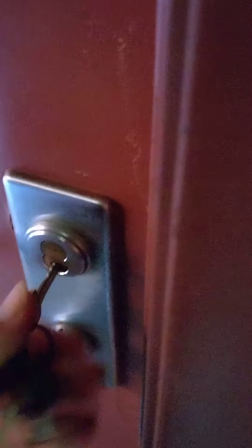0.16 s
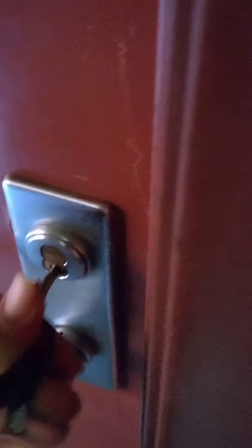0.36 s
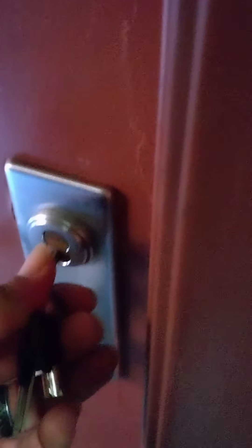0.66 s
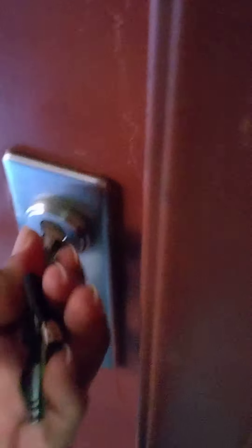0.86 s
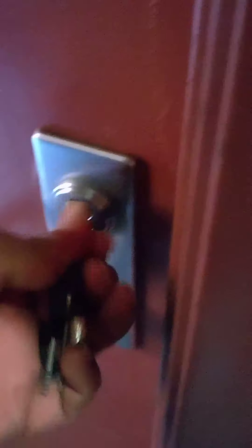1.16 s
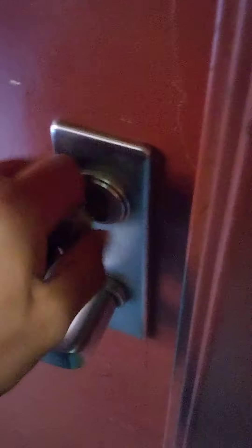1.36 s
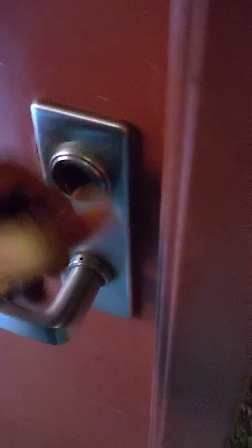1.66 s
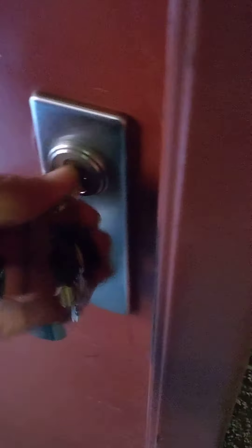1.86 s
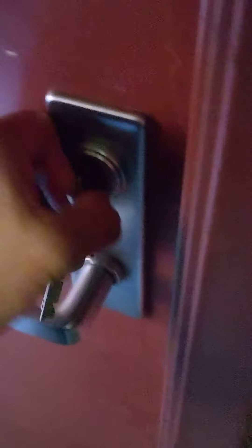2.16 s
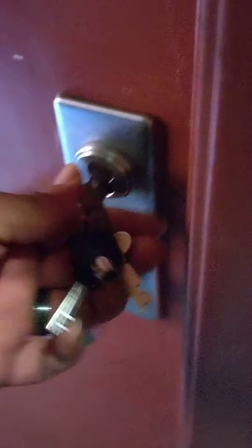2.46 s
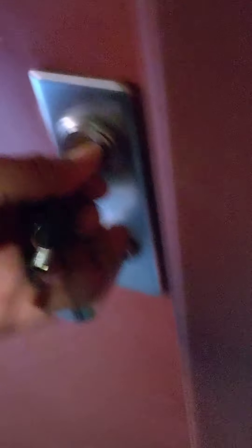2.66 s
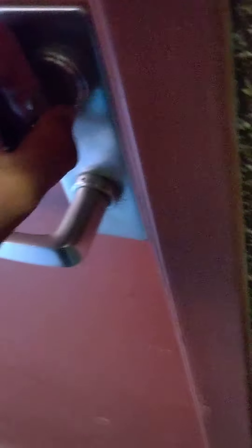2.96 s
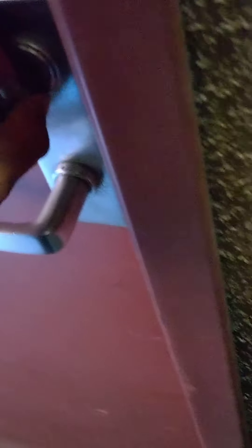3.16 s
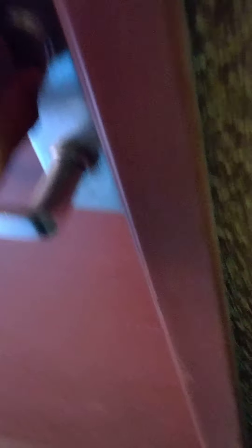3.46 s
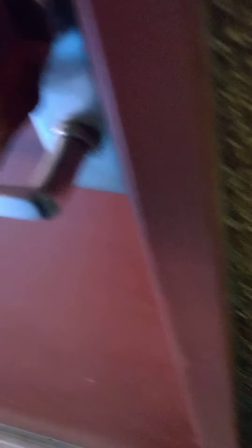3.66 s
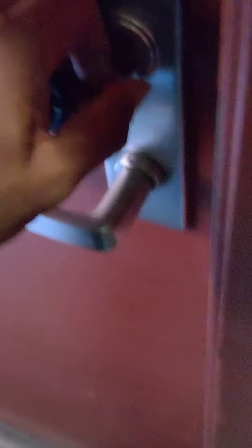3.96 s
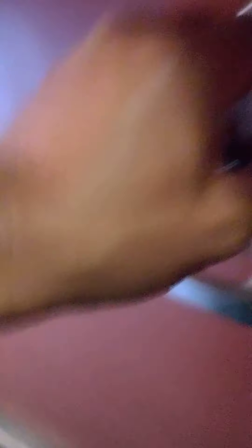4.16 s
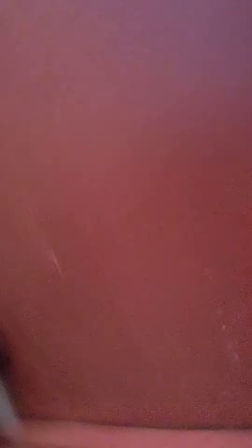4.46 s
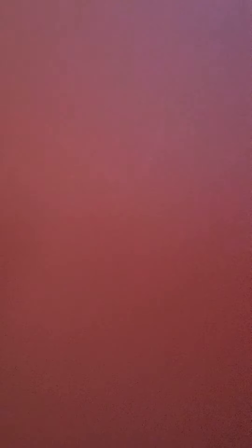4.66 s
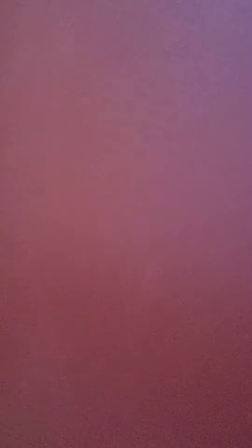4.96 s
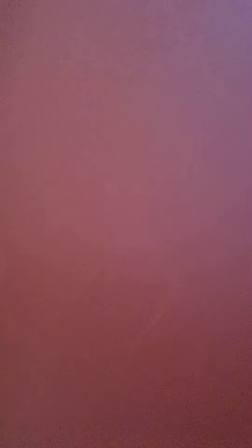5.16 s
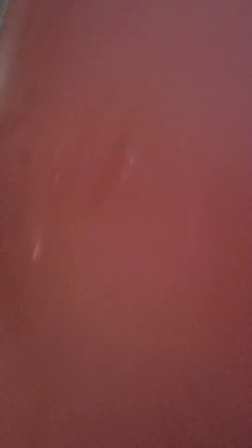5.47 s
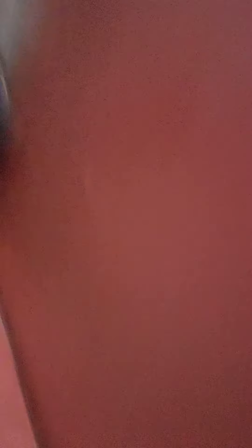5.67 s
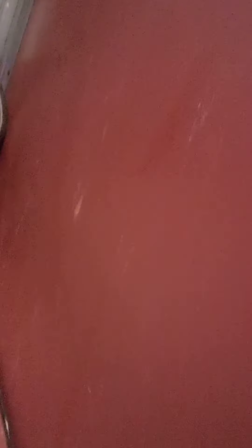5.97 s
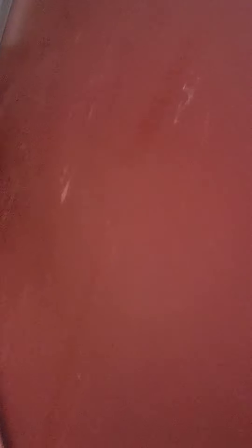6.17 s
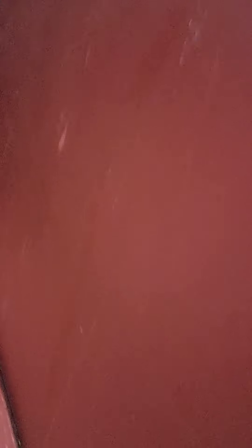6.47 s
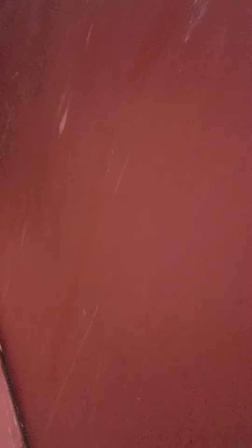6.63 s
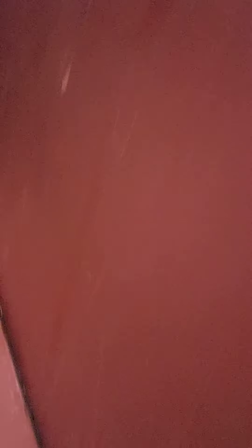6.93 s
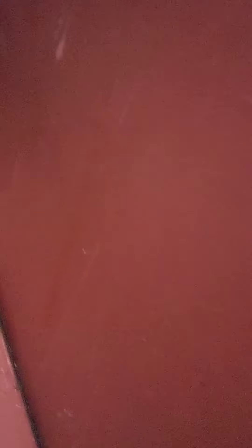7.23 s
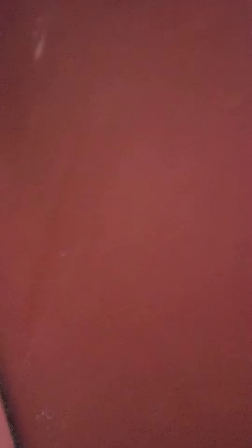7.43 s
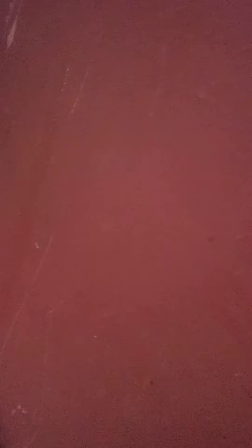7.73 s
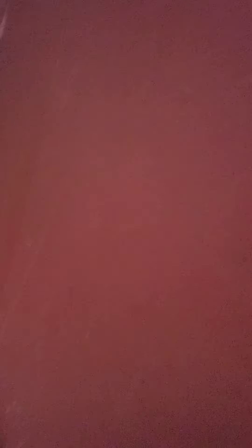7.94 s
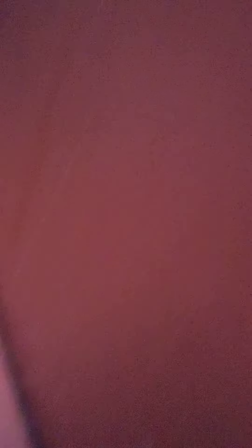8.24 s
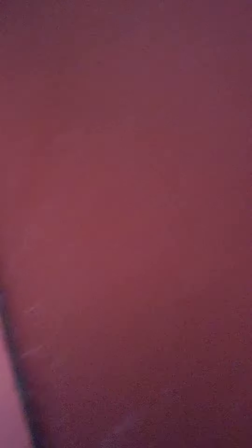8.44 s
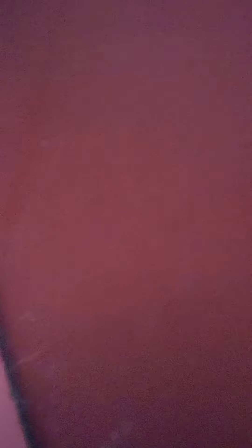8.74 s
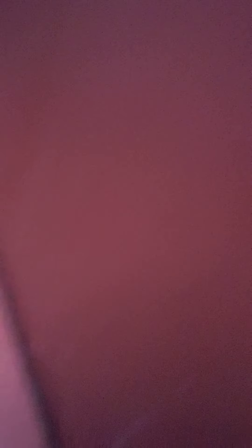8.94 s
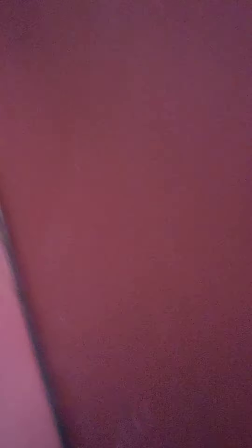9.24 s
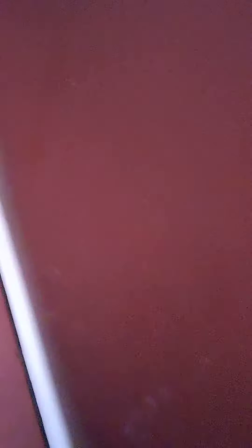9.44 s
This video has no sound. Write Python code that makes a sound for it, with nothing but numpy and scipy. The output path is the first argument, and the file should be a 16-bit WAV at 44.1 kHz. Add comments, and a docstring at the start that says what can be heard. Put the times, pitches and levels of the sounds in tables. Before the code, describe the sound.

A quiet hallway with faint low building hum and slight hiss, heard very close on a hand-held phone, the lock and keys leaning left. From 0.2 to 1.4 s a key clicks and knocks in the lock, with a strong click at 0.5 and a harder clack with a crunchy scrape around 1.4. From 1.6 to 2.8 bright, crisp key clinks jingle in clusters. It thins from 3 to 4.7, with weak knocks, a low grip bump near 3.8 and a skin brush at 4.1. Dull thuds, lock clicks and dry casing ticks come at 5 to 6. Light jingling and small clicks build from 6.2 to 7.6, then rapid knocks lead to a very loud bolt snap at 7.87, its door body and plate humming on briefly. From 8.4 to 9.4 come ringing clinks, clicks, scrapes and casing ticks, fading with a soft brush.

```python
"""Keys in a door lock

A bunch of keys is worked in a door lock in a quiet hallway, close to a hand-held phone with two ports.
Loose keys crack and ring as struck resonators; key and bolt knock and scrape, and the door panel answers.
Skin brushes past, loose parts shift and the casing ticks, all as shaped noise; jolts wobble the grip.
The room adds feedback echoes, the building hums faintly and the left signal sags a few times."""
import sys
import numpy as np
from scipy import signal
from scipy.fft import rfft, irfft, next_fast_len
from scipy.io import wavfile

SR = 44100
rng = np.random.default_rng(int(sys.argv[2]) if len(sys.argv) > 2 else 0)


def unload_audio(sound):
    """Save the sound as a 16-bit wav file, at the path given as the first command line argument."""
    columns = np.transpose(np.atleast_2d(sound))
    # keep every value between -1 and 1, then stretch to whole-number steps
    steps = np.round(np.clip(columns, -1, 1) * 32767)
    wavfile.write(sys.argv[1], SR, steps.astype(np.int16))


N = 423353

# Levels in the tables are relative: each layer trims and filters its own sound afterwards.
# building hum and microphone hiss, the spectrum: (frequency [Hz], level per Hz [dB])
HALL_SPECTRUM = [(8.2, -38.5), (14, 11.5), (36, -1.5), (76, -14.5), (121, -4.5), (245, -6), (858, -25),
                 (3380, -37.5), (6820, -41), (9400, -30.5), (13700, -47.5), (15000, -46.5)]
# how alike the hum is at the two ports: (frequency [Hz], likeness [0 to 1])
HALL_LIKENESS = [(60, 0.94), (300, 0.91), (700, 0.34), (2000, 0.)]
# downward steps of the left signal: (time [s], depth [dB])
SAGS = [(6.821, -42), (7.87, -16.5), (8.478, -19), (8.929, -33.5)]
# jolts through the grip: (time [s], slow wobble level [dB], thud level [dB])
JOLTS = [(.0, -51, -50), (0.449, -42, -38.5), (1.042, -41.5, -41), (1.87, -49, -55), (3.503, -45, -73),
         (3.83, -36, -44), (5.06, -42, -42), (5.491, -47.5, -31), (5.819, -45, -44)]
# skin brushing past the left port: (start [s], length [s], level [dB])
BRUSHES = [(4.086, 0.26, -58), (5.158, 0.3, -68), (8.337, 0.15, -62.5), (9.393, 0.48, -66)]
# how strongly the hand moves the loose parts: (time [s], level [dB])
LOOSE_MOTION = [(0, -69), (.7, -82.5), (1.3, -72.5), (1.6, -61.5), (2.0, -74.5), (2.75, -65.5),
                (3.101, -88), (6.001, -83.5), (6.4, -74), (7.7, -71.5), (8.1, -83.5), (8.598, -67.5),
                (9.6, -82)]
# the phone's casing ticking in the grip, the last row a further dry snap played the same way: (time [s], level
# [dB])
CASING_TICKS = [(4.48, -47.5), (4.769, -51.5), (5.5763, -35), (5.9183, -32.5), (8.734, -36), (9.062, -34),
                (9.3337, -41)]
# how far keys and lock sit towards the left port: (time [s], left over right [dB])
BEARING = [(0, 7.5), (3, 3), (5.7, 7), (6.8, 7.5), (7.8, 12), (9.6, 7)]
# key or bolt dragged over metal: (start [s], length [s], treble level [dB], door body level [dB])
SCRAPES = [(0.338, 0.25, -73, -35.5), (1.412, 0.18, -53, -24), (1.492, 0.043, -50, -18),
           (7.664, 0.041, -56, -33.5), (8.613, 0.086, -87, -42), (9.067, 0.076, -55, -34.5)]
# the lock plate humming on after the bolt: (start [s], t60 [s], frequency [Hz], width [Hz], level [dB])
PLATE_HUM = (7.875, 1.4, 1560, 160, -58)
# modes of the door panel: (frequency [Hz], width [Hz], level [dB])
DOOR_MODES = [(465, 40, 5), (790, 80, 10), (1200, 150, 3), (1570, 120, 5), (1760, 90, 5)]
# key, pins, bolt and handle in the lock: (time [s], metal level [dB], door body over metal [dB])
KNOCKS = [(0.211, -42.5, -32), (0.351, -46.5, -21), (0.4167, -31, -25), (0.4387, -31, -18),
          (0.482, -23, -28.5), (0.61, -35, -19), (0.6556, -44, -23), (0.855, -52, -23),
          (1.041, -24.5, -19.5), (1.3373, -39.5, -16.5), (1.4325, -16, -19), (1.88, -49.5, -4.5),
          (2.0652, -46.5, -16), (2.54, -38.5, -50.5), (2.9895, -53.5, -8.5), (3.0472, -72, 11.5),
          (3.3902, -65.5, -1.5), (3.569, -74.5, 7), (3.728, -43.5, -26), (3.8359, -53, -5),
          (4.025, -37, -23), (4.996, -35, -18.5), (5.06, -42.5, -8), (5.4951, -28, -10), (5.5195, -29, -47),
          (5.701, -35, -15.5), (5.7145, -29, -24), (5.812, -48, -4.5), (6.034, -60, -10.5),
          (6.435, -48.5, -19.5), (6.556, -52.5, -8.5), (6.643, -50, -18), (6.7053, -34, -19),
          (6.7746, -47.5, -8.5), (7.098, -47.5, -9), (7.1578, -42, -19), (7.22, -37.5, -18),
          (7.242, -48.5, -11.5), (7.366, -61, 0), (7.6857, -28, -12.5), (7.768, -30, -24.5),
          (7.776, -28, -19), (7.805, -38.5, -20), (7.8398, -29.5, -8), (7.8547, -20.5, -18),
          (7.867, 0.5, -27), (7.8708, -10, -19), (8.355, -46.5, -22.5), (8.476, -21.5, -28.5),
          (8.5681, -32, -26.5), (8.591, -43, -24), (8.648, -44, -7), (8.668, -30.5, -30), (8.695, -48, -2),
          (8.769, -56.5, 0), (8.886, -23, -27), (9.1016, -26.5, -16), (9.197, -43, -18.5),
          (9.373, -32.5, -25.5)]
# ringing modes, one list for each of four keys: (frequency [Hz], level [dB], t60 [s])
KEY_MODES = [
    [(10110, -5, .14), (10340, -8, .05), (8200, -17, .025)],
    [(11670, -1, .12), (11820, -13, .06), (5480, -14, .1)],
    [(13090, -6, .1), (13210, -14, .06)],
    [(5590, -9, .04), (5960, -12, .05)],
]
# key on key: (time [s], crack level [dB], ring level [dB], names of the keys struck)
CLINKS = [(0.106, -45, -43.5, "cd"), (1.589, -45, -50, "cd"), (1.612, -38, -47, "d"), (1.662, -37, -60, ""),
          (1.6806, -22, -71, "bc"), (1.755, -34, -57, "a"), (1.7938, -26, -52, "abc"),
          (1.8337, -20, -30, "a"), (1.8395, -16, -35.5, "ab"), (1.937, -28, -41, "ab"),
          (2.078, -38, -50, ""), (2.0898, -19.5, -42, "acd"), (2.3462, -17, -42.5, "ac"),
          (2.3811, -14, -32, "ab"), (2.512, -33, -80, "b"), (2.7182, -12, -32.5, "ab"),
          (2.7444, -18, -58, "bc"), (2.7919, -24, -49, "ab"), (3.1424, -30, -35.5, "c"),
          (4.7968, -41, -46, "cd"), (4.858, -42, -57, "cd"), (6.152, -49, -57, "ad"),
          (6.2093, -47, -53.5, "cd"), (6.2645, -44, -62, "cd"), (6.292, -62, -53, "d"),
          (6.3568, -37.5, -65, "bcd"), (6.368, -54, -48, "d"), (6.41, -49, -66, ""),
          (6.8182, -16.5, -40, "bd"), (6.9494, -20.5, -45, "acd"), (7.3852, -35.5, -60, "a"),
          (7.4633, -15, -35, "ac"), (7.4715, -26, -43, "abc"), (7.557, -36.5, -56, "d"),
          (7.609, -29.5, -60.5, "ac"), (8.4742, -28, -17, "ac"), (8.9298, -14, -33.5, "ac"),
          (8.9365, -29, -43, "a"), (8.9465, -23, -48, "ac")]

HALL_RMS_DB = -58   # before a slight lean to the left
ROOM_BASS_T60_S, WALL_CUT_HZ, ROOM_DB = 0.7, 3300, -21.5
PORT_HZ, PORT_WIDTH_HZ, PORT_DB = 9300, 1070, 10.5   # cavity resonance of the microphone ports
LAG_S, LAG_SPREAD = .00048, .25   # delay to the right port; its random share on cracks
SAG_RETURN_HZ = 3.2
CRACK_S = 0.00051   # a crack peaks this long after contact
KNOCK_RATTLE_T60_S, BODY_RATTLE_T60_S = 0.053, 0.13   # metal and door body
MIDDLE_PAN, WOOD_PAN = .4, .2   # shares of the bearing
KEY_NAMES, SHAKEN_DB = "abcd", -17   # keys that are not struck ring this much lower
FLUTTER_DB, STRIKE_SPREAD_DB = 5, 3
TOP_HZ, CUTOFF_HZ = 14300, 15600


def amp(db):
    """Decibels to linear gain."""
    return 10 ** (np.asarray(db) / 20)


def rms_one(x):
    """Scale to an RMS of one."""
    return x / np.sqrt(np.mean(x ** 2) + 1e-20)


def silence():
    """An all but empty stereo track."""
    return np.full((2, N), 1e-18)


def band(x, low_hz, high_hz):
    """Band-pass filter."""
    return signal.sosfilt(signal.butter(2, [low_hz, high_hz], "band", fs=SR, output="sos"), x)


def resonate(x, hz, width_hz):
    """Two-pole resonance, gain 1 on top."""
    r = np.exp(-np.pi * width_hz / SR)
    zeros = np.array([1, 0, -1]) * (1 - r * r) / 2
    poles = [1, -2 * r * np.cos(2 * np.pi * hz / SR), r * r]
    return signal.lfilter(zeros, poles, x)


def port(x):
    """The microphone port lifts the treble around its resonance."""
    return x + amp(PORT_DB) * resonate(x, PORT_HZ, PORT_WIDTH_HZ)


def add(out, s, pan_db, sound, lag_s=LAG_S):
    """Lay a sound into both channels, later at the right port."""
    for side, sign in enumerate((1, -1)):
        at = round((s + side * lag_s) * SR)
        out[side, at:at + len(sound)] += amp(sign * pan_db / 2) * sound[:N - at]


def swell(s, length_s):
    """A smooth rise and fall."""
    progress = np.clip((np.arange(N) / SR - s) / length_s, 0, 1)
    return np.sin(np.pi * progress) ** 2


def burst(noise, rattle_t60_s, rattle_db):
    """A sharp crack, then a lumpy rattle that swells for a moment and dies more slowly."""
    t = np.arange(len(noise)) / SR
    crack = np.sign(noise) * t / CRACK_S * np.exp(1 - t / CRACK_S)
    lumps = np.minimum(noise[(t * 500).astype(int) - 600] ** 2, 2) + 1.11   # a new random level every 2 ms
    envelope = (1 - np.exp(-t / 0.0011)) * amp(rattle_db - 60 * t / rattle_t60_s)
    return crack + noise * lumps * envelope


def loose_ticks(per_s):
    """Random small contacts, a few several dB harder, under the level of the moving parts."""
    strength = amp(3 * np.minimum(rng.exponential(1, N), 2.6))
    ticks = (rng.random(N) < per_s / SR) * strength
    return rms_one(ticks) * amp(np.interp(np.arange(N) / SR, *np.transpose(LOOSE_MOTION)))


def hall():
    """Steady building hum and microphone hiss, alike at both ports only in the bass."""
    log_hz = np.log(np.fft.rfftfreq(N, 1 / SR) + 1)
    hz, level_db = np.transpose(HALL_SPECTRUM)
    spectrum_db = np.interp(log_hz, np.log(hz), level_db)
    hz, likeness = np.transpose(HALL_LIKENESS)
    alike = np.interp(log_hz, np.log(hz), likeness)
    mid, side = rfft(rng.standard_normal((2, N))) * amp(spectrum_db)
    both = np.sqrt(1 + alike) * mid + np.sqrt(1 - alike) * side * [[1], [-1]]
    return amp(HALL_RMS_DB) * rms_one(irfft(both, N)) * amp([[.8], [-.8]])


def room(x):
    """Six feedback delays a side, the treble dying faster."""
    size = next_fast_len(N + SR)
    hz = np.fft.rfftfreq(size, 1 / SR)
    t60 = ROOM_BASS_T60_S / np.sqrt(1 + (hz / WALL_CUT_HZ) ** 2)
    lags_s = rng.uniform(0.0091, 0.038, (2, 6, 1))
    loop = amp(-60 * lags_s / t60) * np.exp(-2j * np.pi * hz * lags_s)
    echoes = (loop / (1 - loop)).sum(axis=1)
    dulling = 1 + (hz / WALL_CUT_HZ / 2) ** 2
    return irfft(rfft(x.mean(axis=0), size) * echoes / dulling, size)[:, :N]


def sags():
    """A downward step in the left channel that the coupling high-pass returns with an overshoot."""
    steps = np.zeros(N)
    for s, depth_db in SAGS:
        steps[round(s * SR)] = -amp(depth_db)
    rounded = signal.lfilter([.02], [1, -.98], np.cumsum(steps))
    coupling = signal.butter(2, SAG_RETURN_HZ, "high", fs=SR, output="sos")
    return signal.sosfilt(coupling, rounded) * [[1], [0]]


def grip():
    """Jolts rock the phone as a decaying low wobble and thud in its body, each laid in for half a second."""
    t, out = np.arange(SR // 2) / SR, np.zeros((2, N))
    for s, wobble_db, thud_db in JOLTS:
        shake = rng.standard_normal(SR // 2)
        sway = np.sin(2 * np.pi * 19 * t) + amp(17.0) * band(shake[::-1], 34, 61)
        wobble = amp(wobble_db - 60 * t / 1.23) * sway
        thud = band(shake * amp(thud_db + 13.5 - 60 * t / 0.43), 90, 300)
        add(out, s, 2, wobble + thud)
    return out


def skin():
    """Skin hisses past the left port as swelling treble noise."""
    hiss = rms_one(port(band(rng.standard_normal((2, N)), 4400, 19845))) * amp([[5], [-9]])
    return hiss * sum(amp(db) * swell(s, length_s) for s, length_s, db in BRUSHES)


def shifting_parts():
    """Parts shift in the lock: noise that swells and dies in hundredths of a second at each contact."""
    flicker = signal.lfilter([.0005], np.poly([.9965, .9965]), loose_ticks(64))
    white = rng.standard_normal((3, N))
    shifting = flicker * (white[0] + 2.15 * white[1:])   # partly shared by both ports
    return amp(3.5) * band(shifting, 460, 1700) + amp(-10.5) * band(shifting, 3400, 11000)


def casing():
    """Dry snaps near the left port with a short hollow knock and hardly any rattle."""
    snaps = silence()
    for s, db in CASING_TICKS:
        snap = burst(rng.standard_normal(SR // 20), 0.005, -1.2)
        add(snaps, s, 17, amp(db - 12.5) * snap)
    return port(band(snaps, 1100, 13300)) + amp(16) * resonate(snaps, 530, 180)


def metal_bands(high, middle):
    """Treble through the port resonance, with the middle band inverted beneath it."""
    return port(band(high, 3400, 12000)) - amp(-0.5) * band(middle, 2500, 6400)


def scrapes():
    """Metal drags over metal: noise with uneven catches grinds in the treble and crunches in the door."""
    high, middle, crunch = silence(), silence(), silence()
    catches = np.repeat(rng.exponential(1, N // 64 + 1), 64)[:N]
    grit = rng.standard_normal(N) * (1.3 + catches)
    for s, length_s, treble_db, body_db in SCRAPES:
        drag = swell(s, length_s) * grit
        add(high, 0, 5, amp(treble_db) * drag)
        add(middle, 0, 2, amp(treble_db) * drag)
        add(crunch, 0, 4, amp(body_db) * drag, lag_s=0)
    return metal_bands(high, middle) + amp(-14.5) * band(crunch, 680, 1600)


def plate_hum():
    """The lock plate hums on after the bolt: narrow noise that starts at once and fades."""
    s, t60, hz, width_hz, db = PLATE_HUM
    since = np.arange(N) / SR - s
    fade = (since > 0) * amp(db - 60 * np.abs(since) / t60)
    return fade * rms_one(resonate(rng.standard_normal(N), hz, width_hz))


def knocks():
    """Metal cracks in the treble; the door panel answers lower and longer, more evenly at both ports."""
    high, middle, wood = silence(), silence(), silence()
    for s, db, body_db in KNOCKS:
        white = rng.standard_normal((2, SR // 4))
        pan_db = np.interp(s, *np.transpose(BEARING))
        metal = amp(db - 12.5) * burst(white[0], KNOCK_RATTLE_T60_S, -8.0)
        body = amp(db + body_db) * burst(white[1], BODY_RATTLE_T60_S, 0.48)
        add(high, s, pan_db, metal, LAG_S * (1 + LAG_SPREAD * white[0, -1]))
        add(middle, s, MIDDLE_PAN * pan_db, metal)
        add(wood, s, WOOD_PAN * pan_db, body, lag_s=0)   # the wide panel reaches both ports at once
    panel = 0
    for k, (hz, width_hz, db) in enumerate(DOOR_MODES):
        # every other mode reaches the two ports in opposite phase
        panel = panel + amp(db) * resonate(wood, hz, width_hz) * [[(-1) ** k], [1]]
    return metal_bands(high, middle) + panel + amp(2.0) * band(wood, 510, 2310)


def ring(blows, hz, level_db, t60):
    """One key mode: a struck, decaying resonator that flutters as the key turns."""
    swing = rms_one(signal.lfilter([1], [1, -.993], rng.standard_normal((2, N))))
    r, w = amp(-60 / (t60 * SR)), 2 * np.pi * hz / SR
    tone = signal.lfilter([0, amp(level_db) * np.sin(w)], [1, -2 * r * np.cos(w), r * r], blows)
    return amp(FLUTTER_DB * swing) * tone


def clinks():
    """A bright crack; each key rings by how hard it is struck, and is struck again as it bounces."""
    crack, rings = silence(), 0
    noise = rng.standard_normal((len(CLINKS), SR // 5))
    pans_db = np.interp([row[0] for row in CLINKS], *np.transpose(BEARING))
    for (s, crack_db, _, _), white, pan_db in zip(CLINKS, noise, pans_db):
        lag_s = LAG_S * (1 + LAG_SPREAD * white[-1])
        add(crack, s, pan_db, amp(crack_db - 16.0) * burst(white, 0.14, -17.5), lag_s)
    bounce_gain = amp(-34.5 - np.arange(SR // 20) / 60)
    for key, modes in enumerate(KEY_MODES):
        jangle = loose_ticks(20)
        crack += amp(-30) * signal.lfilter([1], [1, -.985], jangle) * rng.standard_normal((2, N))
        blows = silence()
        add(blows, 0, 5, amp(-44) * jangle)
        for (s, _, ring_db, struck), white, pan_db in zip(CLINKS, noise, pans_db):
            bounces = np.roll(white, key)[:SR // 20] * bounce_gain
            bounces[0] = 1   # the first blow
            shaken_db = SHAKEN_DB * (KEY_NAMES[key] not in struck)
            blow_db = ring_db + shaken_db + STRIKE_SPREAD_DB * white[-2 - key]
            add(blows, s, pan_db, amp(blow_db) * bounces)
        for hz, level_db, t60 in modes:
            rings = rings + ring(blows, hz, level_db, t60)
    return port(band(crack, 5200, 16000)) + rings


def scene():
    """Hits excite the room; handling, hum and sags stay dry."""
    hits = casing() + scrapes() + plate_hum() + knocks() + clinks()
    handling = grip() + skin() + shifting_parts()
    return hall() + sags() + handling + amp(ROOM_DB) * room(hits) + hits


def record(dry):
    """Peaks stop at full scale, a steep low-pass dulls the top, then the rest is cut."""
    low_pass = signal.butter(10, TOP_HZ, fs=SR, output="sos")
    dulled = signal.sosfilt(low_pass, np.clip(dry, -1, 1))
    return signal.sosfilt(signal.cheby2(12, 60, CUTOFF_HZ, fs=SR, output="sos"), dulled)


dry = scene()
out = record(dry)
unload_audio(out)
```